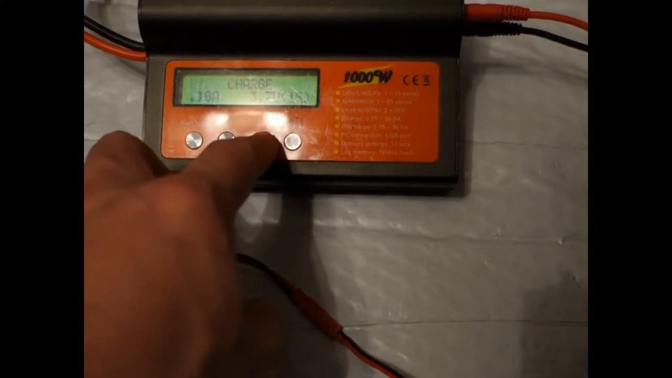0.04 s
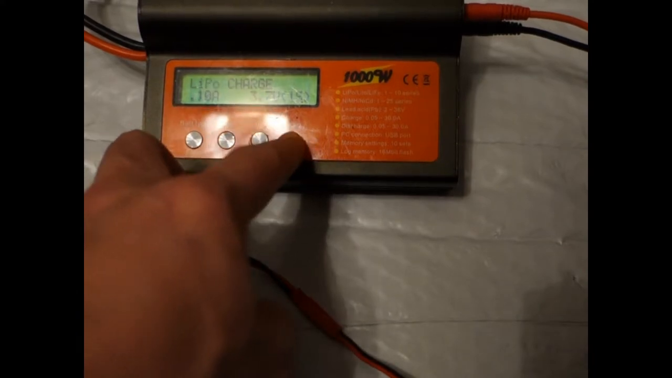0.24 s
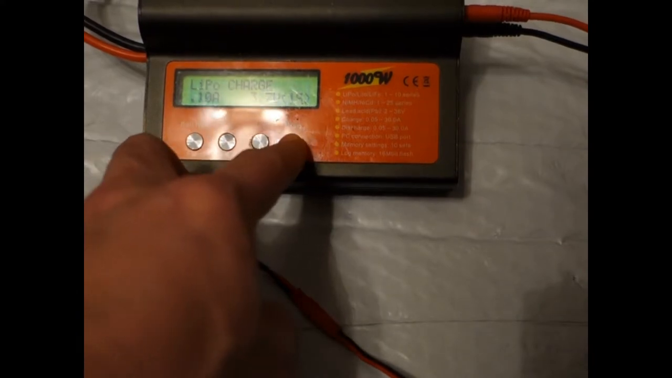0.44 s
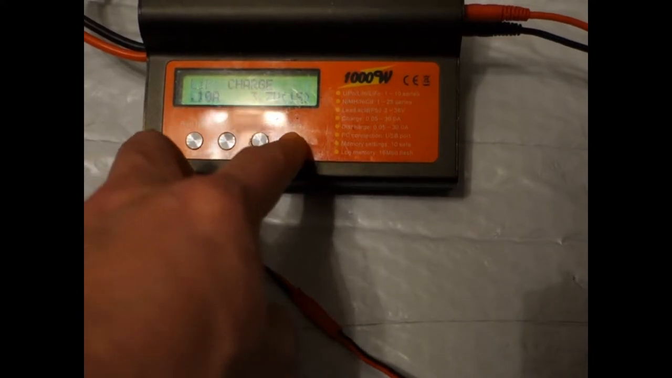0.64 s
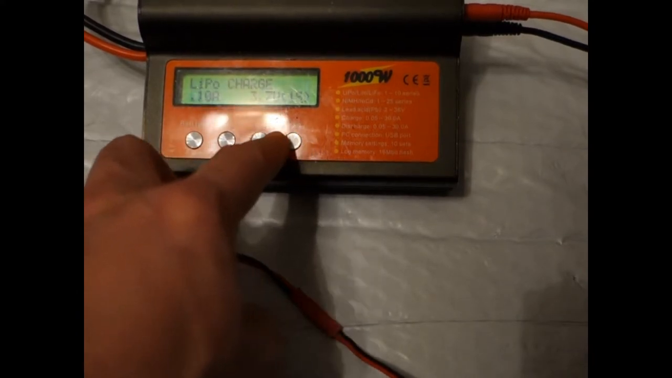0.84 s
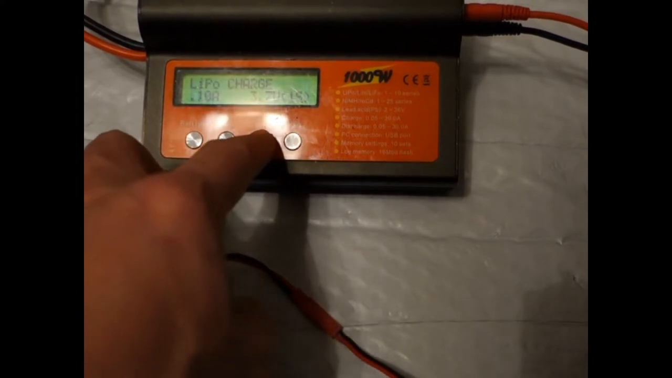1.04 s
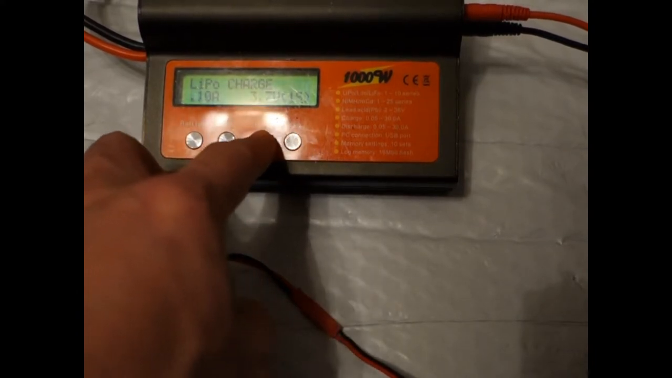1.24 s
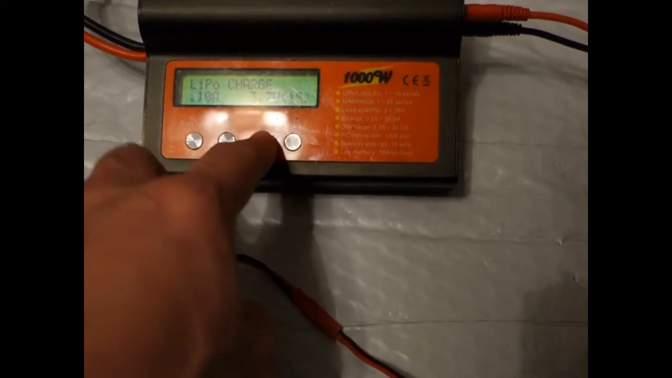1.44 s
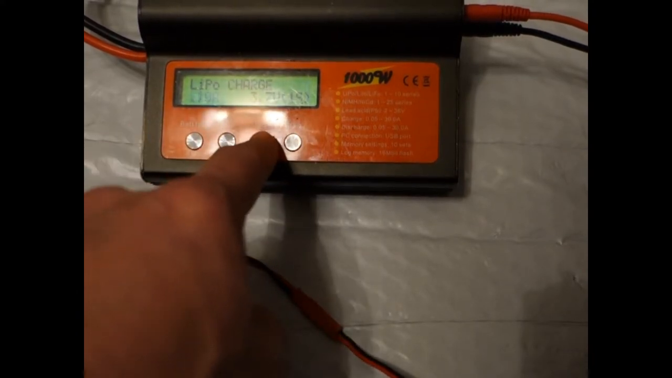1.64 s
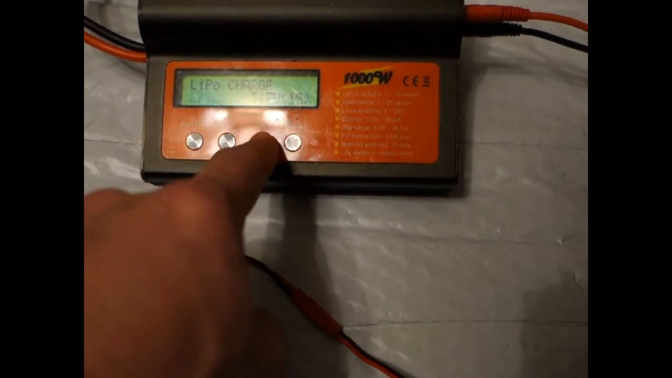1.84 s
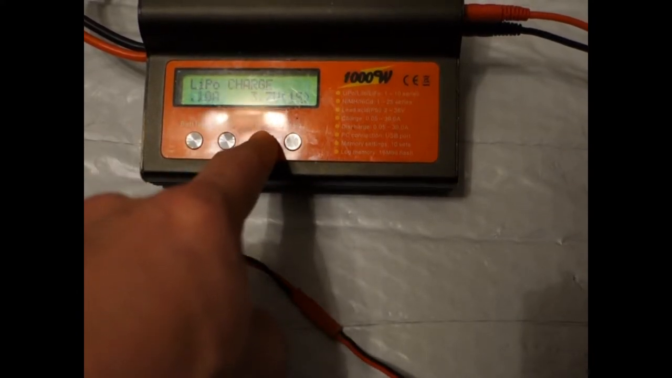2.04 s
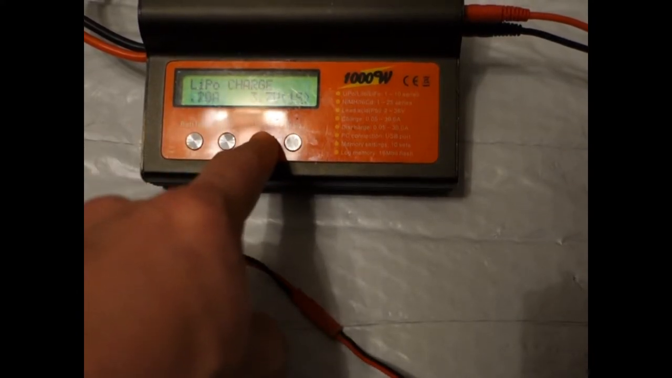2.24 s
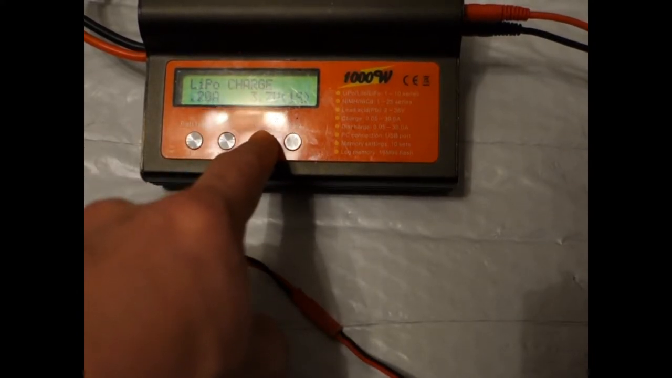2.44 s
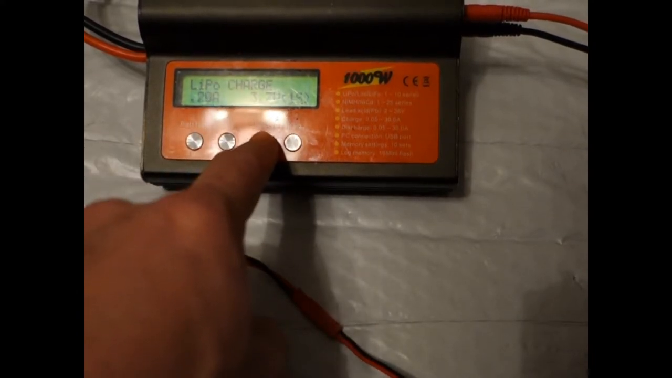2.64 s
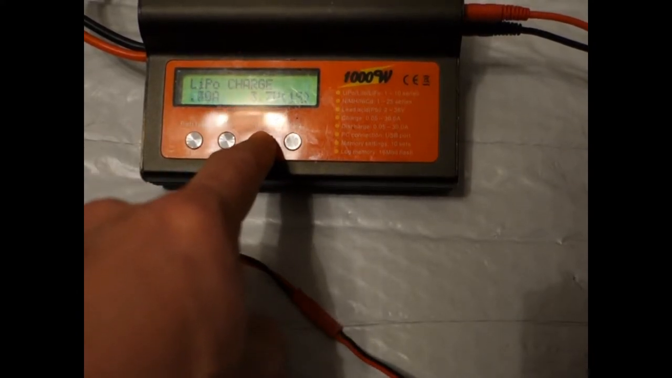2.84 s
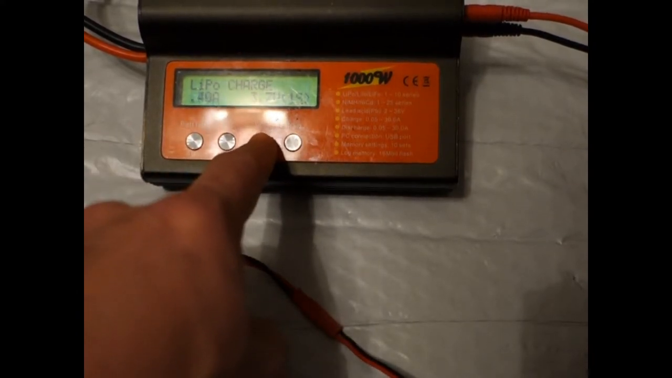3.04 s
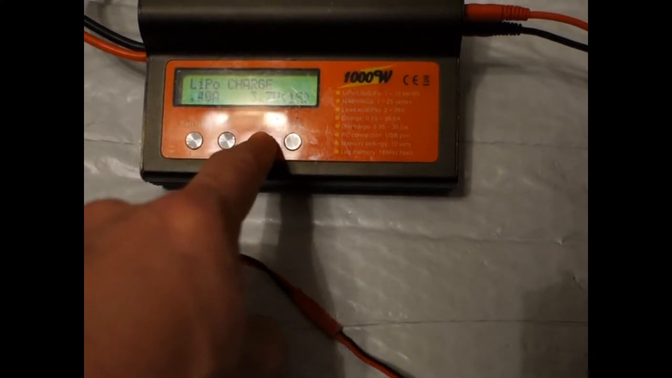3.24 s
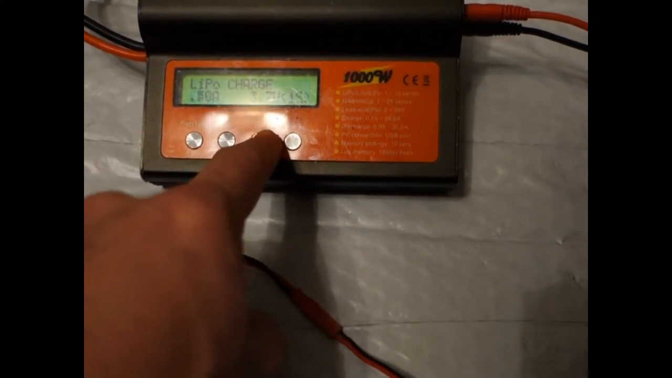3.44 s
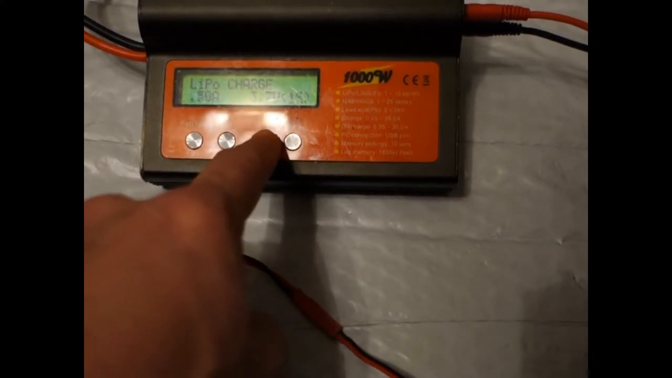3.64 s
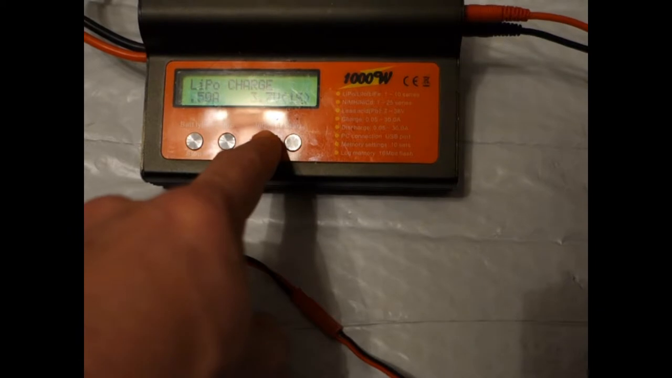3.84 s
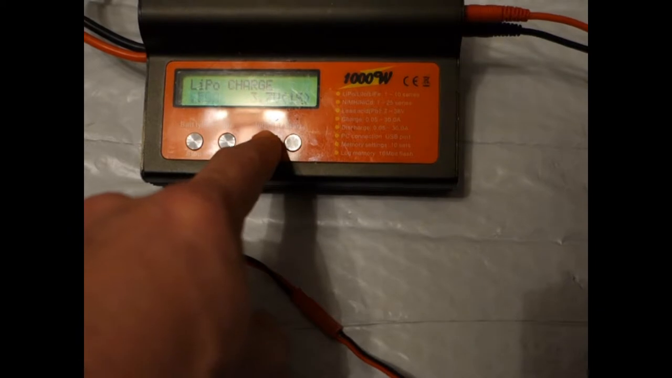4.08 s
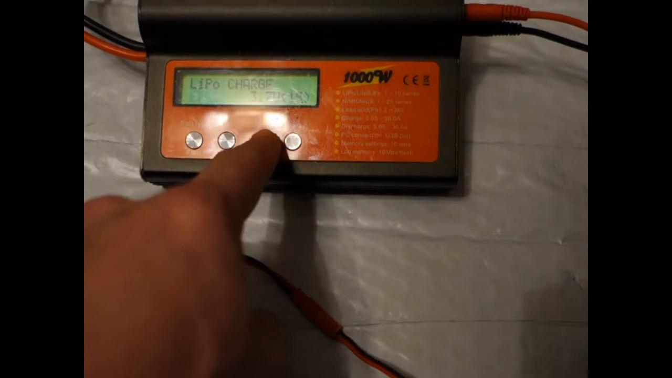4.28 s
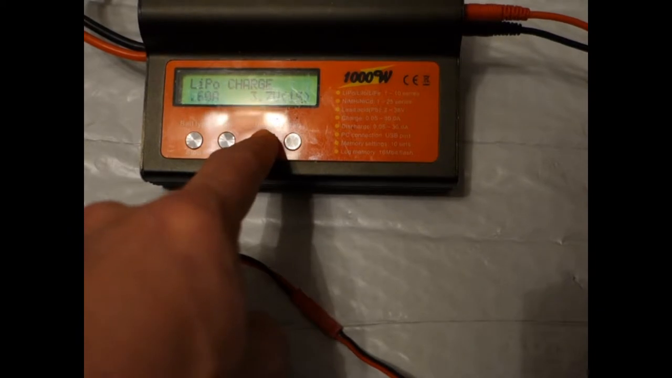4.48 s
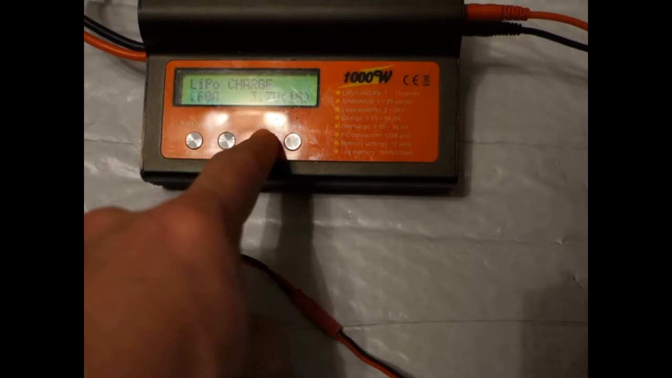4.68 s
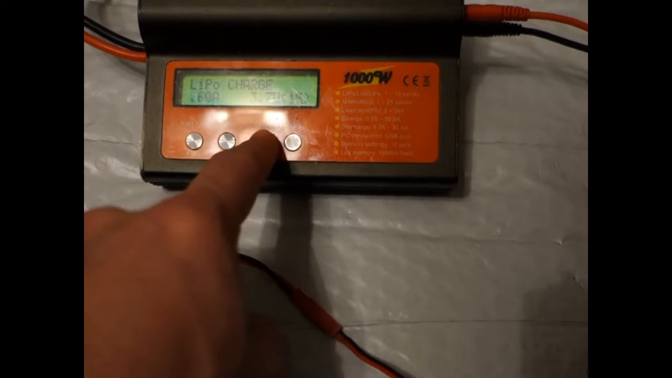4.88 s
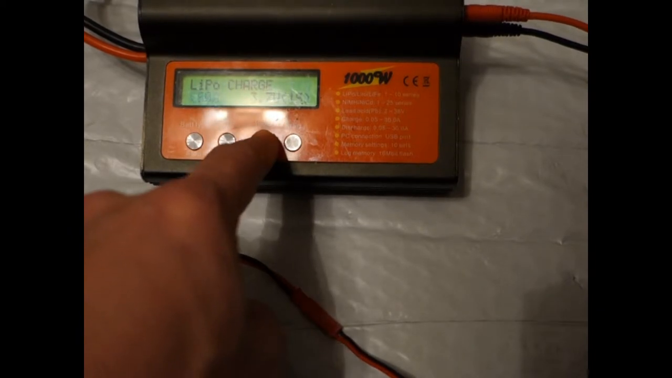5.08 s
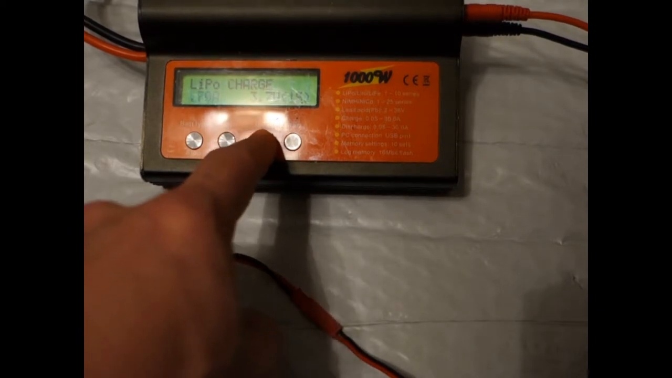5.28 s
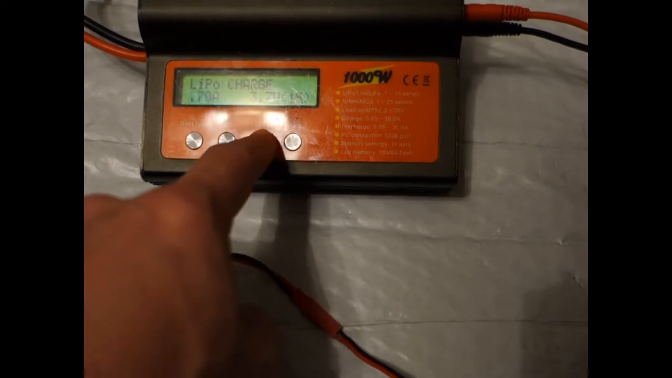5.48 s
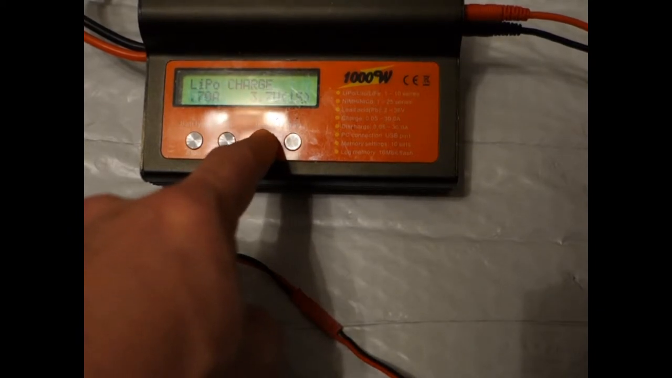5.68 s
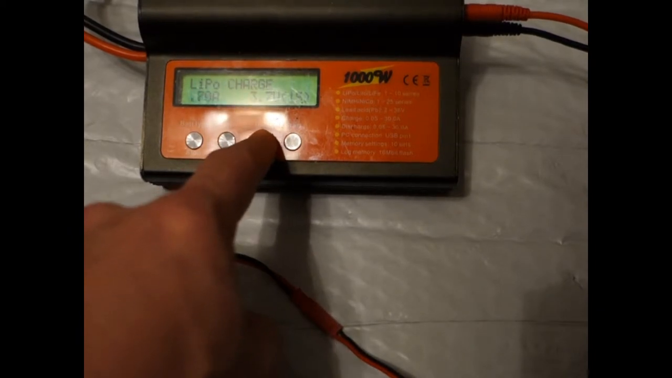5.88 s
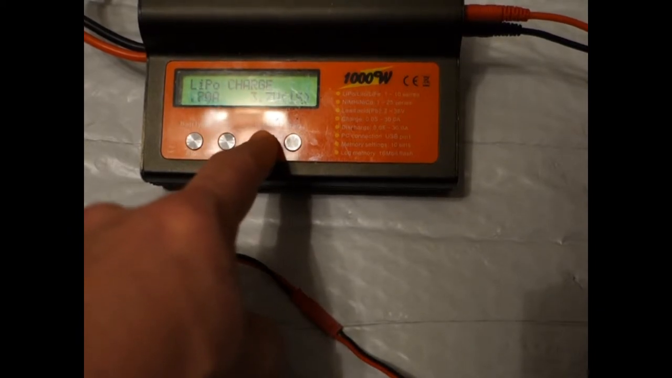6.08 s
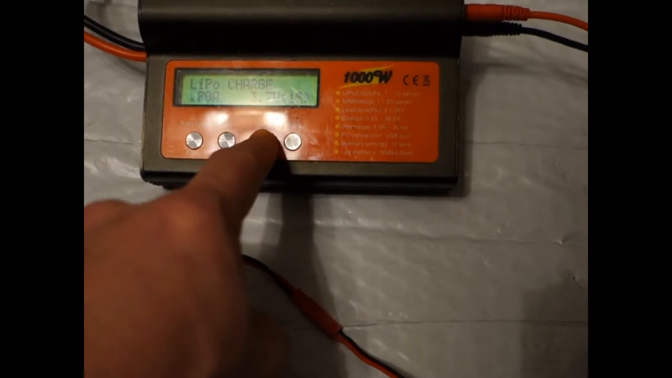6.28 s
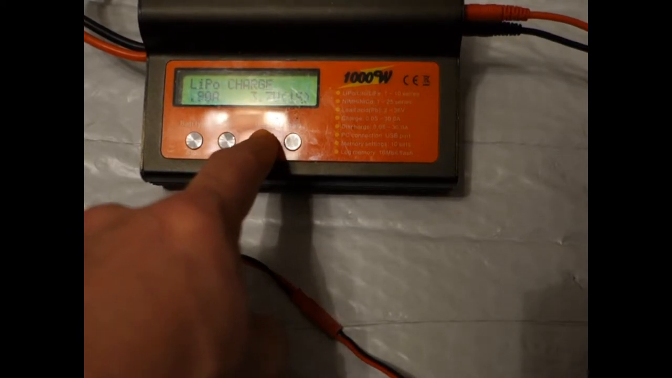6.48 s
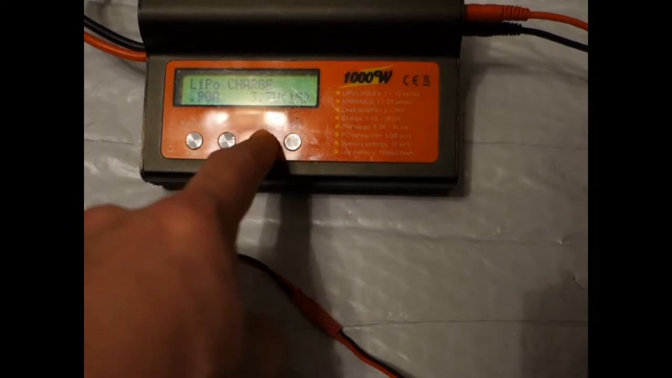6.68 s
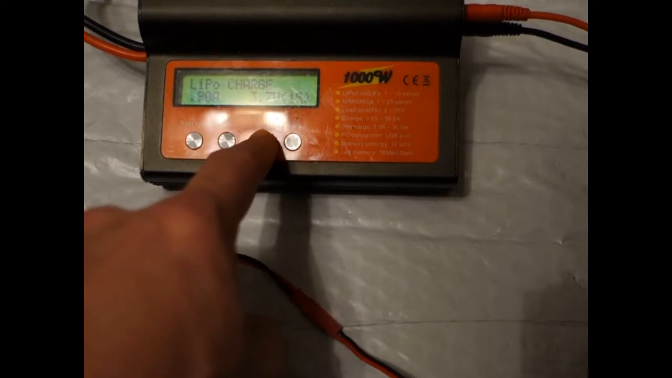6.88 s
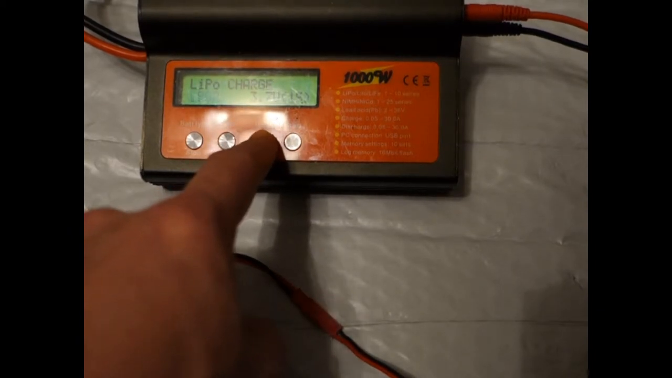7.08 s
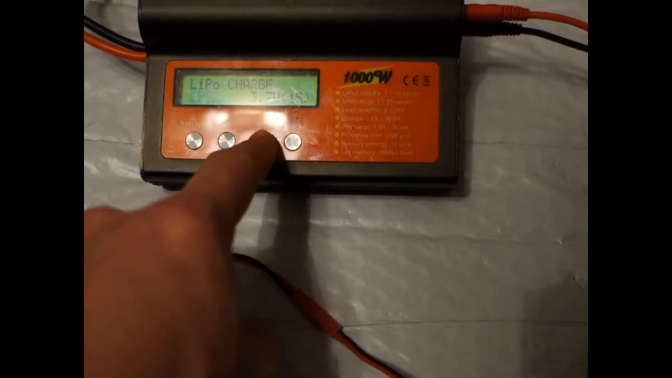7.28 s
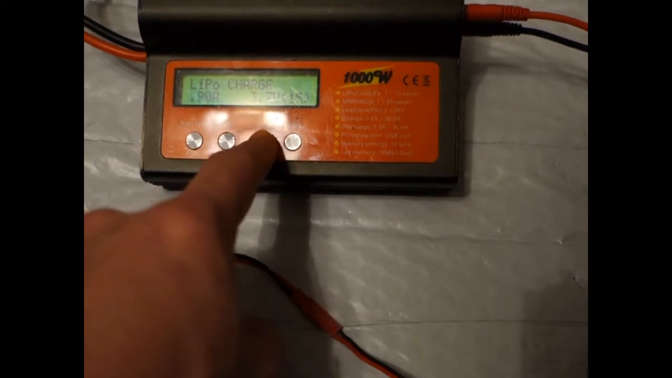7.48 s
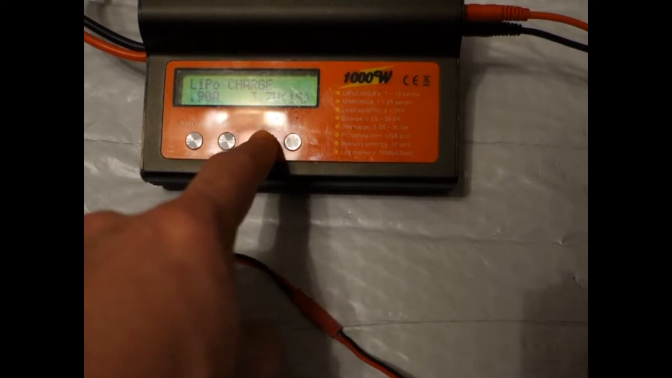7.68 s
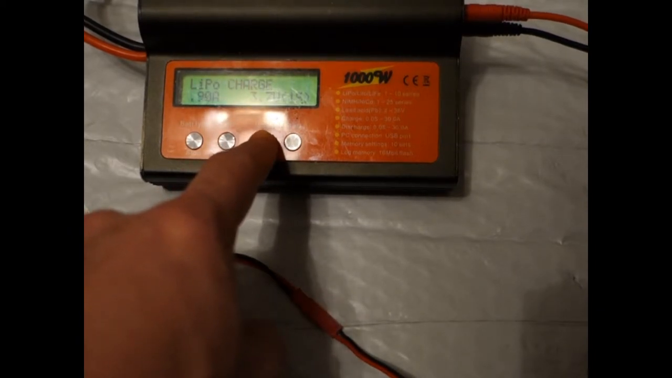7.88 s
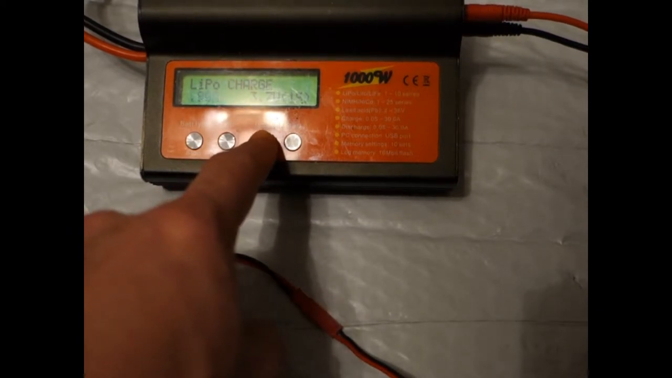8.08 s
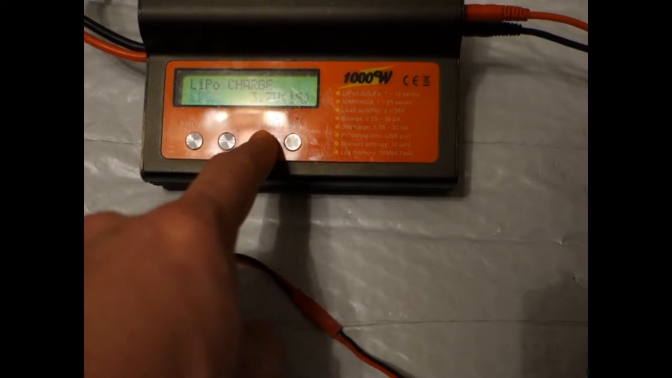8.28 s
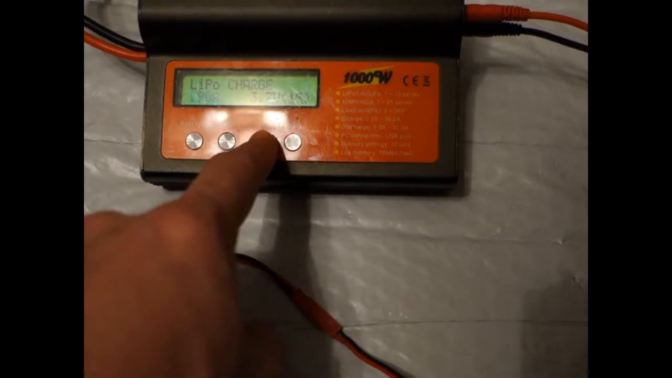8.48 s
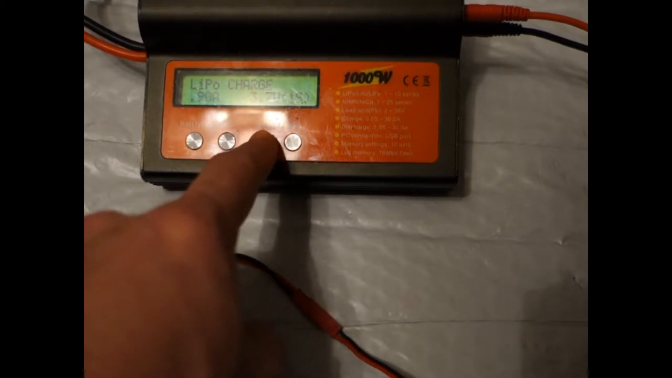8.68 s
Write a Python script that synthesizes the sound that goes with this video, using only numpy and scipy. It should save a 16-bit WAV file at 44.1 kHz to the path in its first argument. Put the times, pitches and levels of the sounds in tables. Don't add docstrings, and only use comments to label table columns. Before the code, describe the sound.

Small dome buttons on a metal-cased device click sharply at irregular intervals over the steady low hum and faint hiss of a little cooling fan.

```python
import sys
import numpy as np
from scipy import signal
from scipy.fft import rfft, irfft, next_fast_len
from scipy.io import wavfile
from scipy.ndimage import uniform_filter1d

SR = 44100
rng = np.random.default_rng(int(sys.argv[2]) if len(sys.argv) > 2 else 0)


def wav_record(signal):
    frames = np.transpose(np.atleast_2d(signal))
    bounded = np.clip(frames, -1, 1)
    quanta = np.round(bounded * 32767).astype(np.int16)
    wavfile.write(sys.argv[1], SR, quanta)


def ratio(d):
    e = np.asarray(d, float) / 20
    return 10 ** e


N = 384552
STRIKE_N = 4096


def unit(x):
    return x / np.sqrt(np.mean(x ** 2))


def on_log(hz, table):
    f, value = np.transpose(table)
    return np.interp(np.log(np.maximum(hz, 1)), np.log(f), value)


def history(table):
    return np.interp(np.arange(N) / SR, *np.transpose(table))


def curve(table):
    db = history(table)
    return db - db.mean()


def walk(rate):
    hold = int(SR / rate)
    steps = np.repeat(rng.standard_normal(N // hold + 1), hold)
    return unit(uniform_filter1d(uniform_filter1d(steps, hold), hold)[:N])


def highpass(x, hz):
    return signal.sosfilt(signal.butter(1, hz, "highpass", fs=SR, output="sos"), x)


# (f/Hz, correlation [-1..1])
PORT_LIKENESS = [(25, 0.95), (60, 0.76), (120, 0.99), (240, 1), (340, 0.83), (600, 0.73), (1200, 0.89),
                 (2200, 0.64), (3200, -0.083), (11000, -0.092)]


def noise(gain):
    size = next_fast_len(N, True)
    hz = np.arange(size // 2 + 1) * SR / size
    alike = np.clip(on_log(hz, PORT_LIKENESS), -1, 1)
    white = rfft(rng.standard_normal((2, size)))
    mid, side = white * gain(hz) * np.sqrt([1 + alike, 1 - alike])
    return unit(irfft([mid + side, mid - side], size)[:, :N])


def resonances(table, flicker_db):
    out = 0
    for centre, width, db, pan_db in table:
        band = noise(lambda hz: 1 / (1 + (2 * (hz - centre) / width) ** 2) ** 0.9)
        pan = np.array([[pan_db], [-pan_db]]) / 2
        out = out + ratio(db + flicker_db * walk(6.8) + pan) * band
    return np.array([out[0], np.roll(out[1], 3)])


# (multiple of the shaft rate [1], rms level/dB)
MOTOR_TONES = [
    (1, -89),
    (3, -103),
    (4, -50.5),
    (6, -75),
    (8, -80),
    (20, -79.5),
]
# (t/s, level/dB)
HUM_LEVEL = [(0.0, -55.5), (0.09, -51), (4.39, -51.5), (4.42, -53.5), (4.52, -47), (4.59, -52), (5.05, -50),
             (5.32, -50), (5.34, -51.5), (6.36, -51.5), (6.53, -52.5), (6.68, -49.5), (7.02, -52),
             (7.34, -50), (7.97, -52.5), (7.99, -50), (8.67, -51), (8.72, -50.5)]


def motor(turn):
    flutter = ratio(curve(HUM_LEVEL) + 1.4 * walk(16.0) + 0.5 * walk(9.0) + 0.3 * walk(24.0))
    return flutter * sum(ratio(db) * np.sqrt(2) * np.sin(k * turn + k) for k, db in MOTOR_TONES)


# (f/Hz, width/Hz, level/dB, left minus right level/dB)
CASE_MODES = [(439, 24, -18.5, 13.5), (838, 42, -11, 7), (886.8, 9.5, -8.5, 0), (931, 60, -8.5, 3.5),
              (1137.5, 20, -10.5, -9.5), (1195.5, 8.8, -9, 4.5), (1242, 14, -13, 9), (1206, 140, -10.5, 5),
              (1347, 61, -10.5, -4.5), (1412, 30, -12.5, 6), (1488, 72, -5, 5.5), (1549.3, 27, -0.5, -1.5),
              (2222, 186, -10.5, -8.5)]
# (t/s, level/dB)
RATTLE_LEVEL = [(0.0, -57), (0.46, -58), (0.87, -61.5), (1.26, -57.5), (1.77, -64.5), (2.26, -57),
                (3.11, -62), (3.28, -63), (3.89, -67), (5.32, -58.5), (5.54, -62.5), (6.04, -63),
                (6.29, -58), (6.77, -59.5), (7.09, -55.5), (7.65, -59.5), (8.52, -60), (8.72, -57)]


def bearing_rattle(throb):
    return unit(resonances(CASE_MODES, flicker_db=-0.34) * throb) * ratio(1.5 + history(RATTLE_LEVEL))


# (f/Hz, width/Hz, level/dB, left minus right level/dB)
BALL_MODES = [(3070, 89, -18, 0), (3417, 78, -5.5, -0.4), (4440, 110, -3.5, -1.3), (4704, 200, 2, -1.2),
              (6460, 220, -8.5, -0.38), (8730, 360, -8.5, -0.54)]
# (t/s, level/dB)
BALL_LOAD = [(0.0, -83), (0.68, -73.5), (1.65, -78.5), (1.85, -70), (2.09, -78.5), (2.67, -76.5),
             (3.98, -79), (4.44, -72.5), (4.66, -79), (5.08, -75), (5.22, -77), (5.93, -81.5), (6.36, -74),
             (6.7, -81), (7.07, -75.5), (7.58, -81), (8.62, -78), (8.72, -76)]


def ball_whisper(throb):
    level_db = -73 + curve(BALL_LOAD) + 0.6 * walk(2.5)
    return unit(resonances(BALL_MODES, flicker_db=2.0) * throb) * ratio(level_db)


# (f/Hz, level per Hz/dB)
AIR_SPECTRUM = [(30, -24), (60, -25), (100, -11.5), (160, -0.5), (230, 6.5), (330, -7), (500, -8),
                (680, -14), (1200, -13), (1800, -17), (3000, -17), (5500, -23), (8000, -25), (11000, -30.5)]
# (t/s, level/dB)
AIR_FLOW = [
    (0, -1),
    (.8, 1),
    (1.4, -0.5),
    (2.6, 1),
    (3.7, 0),
    (4.7, 0.3),
    (5.8, 0.1),
    (7, -0.3),
    (7.6, -0.9),
    (8.72, -1),
]


def air_noise():
    air = noise(lambda hz: ratio(on_log(hz, AIR_SPECTRUM)))
    hiss = highpass(air, 5600)
    air = air + hiss * (ratio(0.5 * walk(2.63)) - 1)
    return air * ratio(-60 + curve(AIR_FLOW) + 0.3 * walk(3.17) + 0.13 * walk(3.4))


def fan():
    shaft_hz, cage_hz = 49.07, 12.3
    turn = 2 * np.pi * np.cumsum(shaft_hz * (1 + 0.00041 * walk(1.47))) / SR
    cage = 2 * np.pi * np.cumsum(cage_hz * (1 + 0.036 * walk(2.647))) / SR
    cage_db = 2.8 * np.sin(cage) + 0.5 * np.sin(2 * cage)
    shaft_db = 2.0 * np.sin(turn) + 1.1 * np.sin(6 * turn)
    throb = ratio(cage_db + shaft_db + 0.7 * walk(9.0))
    return motor(turn) + bearing_rattle(throb) + ball_whisper(throb) + air_noise()


def ring(modes, tilt_db, scatter_db, detune):
    t = np.arange(STRIKE_N) / SR
    out = 0
    for k, (hz, db, t60) in enumerate(modes):
        level_chance, pitch_chance = rng.standard_normal(2)
        level_db = db + tilt_db * np.log2(hz / modes[0][0]) + scatter_db * level_chance
        swing = np.sin(2 * np.pi * hz * (1 + detune * pitch_chance) * t)
        out = out + (-1) ** k * ratio(level_db) * 1000. ** (-t / t60) * swing
    return out


def chatter(x, lags_ms, bounce):
    for lag in np.maximum(lags_ms * SR / 1000, 1).astype(int):
        back = np.r_[1, np.zeros(lag - 1), -bounce]
        x = signal.lfilter(back[::-1], back, x)
    return x


# (f/Hz, level/dB, T60/s)
KEY_CAP = [(3220, 7.5, 0.0044), (2870, -3, 0.0084), (3570, 3.5, 0.0066), (4160, -1, 0.0086),
           (4860, -1.5, 0.01)]
CASE_BASE = [(365, -2, 0.021), (455, 2, 0.014), (654, -5.5, 0.022), (854, -3.5, 0.088)]
CASE_WALLS = [(940, -6, 0.015), (1188, 4, 0.019), (1090, -8, 0.012), (1351, 3.5, 0.012),
              (1487, -4.5, 0.029), (1593, 2.5, 0.0078)]
FACE_PLATE = [(1646, -2.4, 0.03), (1787, -5.5, 0.018), (2220, 0.3, 0.0097), (2512, -2, 0.018),
              (2626, -0.5, 0.0096)]
DOME_CROWN = [(5150, -0.5, 0.0044), (5560, 0.2, 0.0027), (6340, 0.8, 0.0023)]
DOME_RIM = [(7270, -1.8, 0.006), (7620, 0.28, 0.0032), (8420, 2, 0.0044), (9750, 0.5, 0.003),
            (10270, -2, 0.0062), (11360, 0.25, 0.00074)]
LONG_CAP_RING = [(2800, -8, 0.085), (2970, -0.5, 0.035), (3334, -3, 0.03), (1733, -13, 0.09),
                 (1997, -16.5, 0.12), (4080, -14, 0.08), (4930, -11, 0.045), (2880, -9, 0.053)]
# (left minus right level/dB, share common to both [0..1])
PART_PATHS = [
    (-3, 0.42),
    (1, 1),
    (2.5, 0.98),
    (-5.5, 0.82),
    (-1, 0.89),
    (-2.5, 0.37),
    (13, 1),
]
PUSH_RISE_MS = (.12, .5, .45, .2, .06, .04, .2)


def strike(part, tilt_db, slow):
    parts = (KEY_CAP, CASE_BASE, CASE_WALLS, FACE_PLATE, DOME_CROWN, DOME_RIM, LONG_CAP_RING)
    chatter_ms = (0.5, 0.5, 0.4, 0.45, 0.45, 0.4, 0.3)[part]
    pan_db, share = PART_PATHS[part]
    body = ring(parts[part], tilt_db, scatter_db=2.5, detune=0.004)
    t_ms = np.arange(STRIKE_N) / SR * 1000
    body = body * (1 - np.exp(-t_ms / (PUSH_RISE_MS[part] * max(slow, 0.2)))) ** 2
    common, own = (chatter(body, chatter_ms * (0.15 + lags), 0.4) for lags in rng.random((2, 3)))
    peak = np.abs(signal.hilbert(common)).max()
    return np.array([ratio(side * pan_db / 2) * (np.sqrt(share) * common + side * np.sqrt(1 - share) * own)
                     for side in (1, -1)]) / peak


# (t/s, cap snap peak level/dB, wall knock peak level/dB,
# dome level re snap/dB, base level re knock/dB)
STROKES = [(0.2147, -46.5, -57, -5.5, 0), (0.4382, -22, -31.5, -7, -11.5), (0.607, -30, -36.5, 3, -1.5),
           (0.6744, -37, -52, -0.5, -3), (1.0898, -66, -50.5, -9, -1), (1.8, -47.5, -36, -11, -6),
           (1.9823, -41, -30, -2.5, -8.5), (2.22, -51, -39, -4, -3), (2.3986, -33.5, -33, 8, -5.5),
           (2.573, -53, -38.5, -5, -2.5), (2.7436, -33, -37.5, 7, -0.5), (2.9643, -45, -35.5, -7, -7.5),
           (3.1152, -28.5, -29.5, -2.5, -8.5), (4.079, -34.5, -31, -4.5, -8), (4.2107, -43, -30, -7, -7),
           (4.96, -43, -38, -8.5, -7.5), (5.1048, -41.5, -31, -2.5, -6.5), (5.5087, -45, -41.5, -11, -15),
           (5.703, -52.5, -37, -9.5, -4.5), (6.0866, -46.5, -35.5, -3, -7), (6.2462, -41.5, -32, -1, -6),
           (6.59, -73, -53, -11, -15)]
# (face plate level re usual/dB, dome rim level re crown/dB, cap ring level/dB,
# slowness of the push [1 = usual])
LANDING = [(1, -2, -6, 0.95), (0, 1, -5, 1.6), (2.5, -3, 5.5, 1.3), (-6, -2, -10, 1.1), (2, .1, .1, 1.1),
           (4, 5, -1, 1.6), (7, .1, 2, 0.93), (-4, 0, 6, 0.79), (3.5, -3, 3, 2.9), (1, 4, 5, 0.85),
           (5.5, -2.5, 6.5, 0.55), (-2, 3.5, 4, 1.4), (-3.5, 2.5, 0, 1), (-6, -3.5, 2, 1.3),
           (1.5, -3, -2, 0.49), (-0.5, -3, 0, 1.1), (-1, 0.8, -7, 0.77), (-3, 1.5, 1, 0.66),
           (2.5, 7, 4.5, 1.2), (1.5, -2, 5, 0.93), (-3, -3.5, -4, 0.74), (.1, .1, .1, 1.1)]
# (soft contact before the snap/ms, its level/dB, table rebound after/ms, its level/dB)
FINGER_CONTACT = [(1.3, -22, 4, -3), (1.47, -4, 6.5, -8), (1.55, -20, 4.2, -11), (1.3, -24, 3.6, 0),
                  (1.3, -12, 3.1, -6), (2.3, -12, 4.07, -8), (1.5, -15, 3.9, -2), (2.26, -8, 3.14, 2),
                  (1.53, -11, 3.8, -3.5), (2.94, -3, 3.75, -3.5), (1.43, -23, 4.2, -12),
                  (2.74, -6, 3.16, -2.5), (1.59, -9, 4.2, -19), (2.03, -11, 3.9, -2.2),
                  (1.64, -10, 4.14, -2.7), (1.84, -13, 3.54, -7), (1.67, -28, 4, -6), (2.18, -5, 3.6, -5),
                  (1.6, -10, 4, -5), (2.1, -11, 3.6, -5.5), (1.6, -26, 4.2, -12), (1.8, -12, 4.1, -6)]
# tilt/(dB per octave) of (cap, base, walls, plate, dome)
MODE_TILT = [(.1, 3, .1, .1, .1), (0.6, 4, .1, .1, .1), (-0.072, 5, -8, .1, .1), (.1, 5, .1, .1, .1),
             (.1, 3, .1, .1, .1), (-2, 4.6, 10, .1, .1), (-2, 2.6, 5, 2, .1), (.1, 3, 4, .1, .1),
             (.1, 4, 12, .1, .1), (-2, 4, -6, .1, .1), (.1, 3, -3, .1, .1), (.1, 3.4, -4, .1, .1),
             (.1, 3, 5, .1, .1), (-0.13, 5.3, .1, .1, .1), (.1, 4.6, 13, .1, .1), (.1, 3.4, -4, .1, .1),
             (.1, 3.3, .1, .1, .1), (.1, 2.7, .1, .1, .1), (.1, 3.4, .1, .1, .1), (.1, 3, .1, .1, .1),
             (.1, 6, -2, .1, .1), (.1, 3, .1, .1, .1)]
PART_FEELS_DB = (-8, -7, 0, -2, -10, -11, -10)


def buttons():
    out = np.zeros((2, N + 8192))
    for stroke, landing, contact, tilt in zip(STROKES, LANDING, FINGER_CONTACT, MODE_TILT):
        s, snap_db, knock_db, dome_db, base_db = stroke
        touch_db, rim_db, ring_db, slow = landing
        lead_ms, lead_db, back_ms, back_db = contact
        plate_db = snap_db - 1 + touch_db + 0.18 * (knock_db - snap_db)
        crown_db = snap_db + dome_db
        parts_db = (snap_db, knock_db + base_db, knock_db, plate_db,
                    crown_db, crown_db + rim_db, snap_db - 9.5 + ring_db)
        for part, part_db in enumerate(parts_db):
            heard = ratio(part_db) * strike(part, (*tilt, 0, 0)[part], slow)
            feels_db = PART_FEELS_DB[part]
            jolts = ((0, 0), (-lead_ms, lead_db + feels_db), (back_ms, back_db + feels_db),
                     (2 * back_ms, back_db + feels_db - 10.5))
            for ms, db in jolts:
                for ear in (0, 1):
                    i = int(s * SR) + ear + int(ms * SR / 1000)
                    out[ear, i:i + STRIKE_N] += ratio(db) * heard[ear]
    return highpass(echo(out)[:, :N], 170.)


def echo(x):
    delay_ms, level_db, dull_hz = 12.5, -18, 4000
    dull = signal.lfilter(*signal.butter(1, dull_hz, fs=SR), x)
    return x + ratio(level_db) * np.roll(dull, int(delay_ms * SR / 1000), axis=1)


def table_thump():
    thump_hz, t60_s, re_knock_db = 77, 0.038, -26
    jolts, t = np.zeros(N), np.arange(STRIKE_N) / SR
    for s, _, knock_db, *_ in STROKES:
        jolts[int(s * SR)] = ratio(knock_db + re_knock_db)
    mode = np.sin(2 * np.pi * thump_hz * t) * 1000. ** (-t / t60_s)
    return signal.fftconvolve(jolts, mode)[:N]


# (f/Hz, level/dB, T60/s)
ROOM_BANDS = [(560, -26.5, 0.41), (1160, -28.5, 0.14), (1890, -30, 0.39), (3720, -26.5, 0.2),
              (6940, -37.5, 0.74), (9100, -20, 0.1)]


def room(x):
    t = np.arange(SR // 2) / SR
    tail = 0
    for hz, db, t60 in ROOM_BANDS:
        band = signal.butter(2, [hz / np.sqrt(2), hz * np.sqrt(2)], "bandpass", fs=SR, output="sos")
        hits = signal.sosfilt(band, rng.standard_normal((2, len(t))))
        tail = tail + ratio(db) * hits * 1000. ** (-t / t60)
    tail = tail + 0.21 * tail[::-1]
    grain = uniform_filter1d(np.repeat(rng.standard_normal(SR // 64), 40)[:len(t)], size=24)
    tail = tail * ratio(1.5 * grain * np.exp(-t / 0.092))
    tail = tail * np.clip(t / 0.0012, 0, 1) ** 2
    paths = (tail, tail[::-1] * [[1], [-1]])
    return sum(signal.fftconvolve(side[None], path, axes=1)[:, :N] for side, path in zip(x / 2, paths))


def scene():
    clicks = buttons()
    return fan() + clicks + table_thump() + ratio(-6.0) * room(clicks)


def band_limit(x):
    return signal.sosfilt(signal.butter(12, 11780, fs=SR, output="sos"), x)


def record(dry):
    top = signal.ellip(9, 0.2, 50, 11000, fs=SR, output="sos")
    return band_limit(signal.sosfilt(top, dry))


dry = scene()
out = record(dry)
wav_record(out)
```